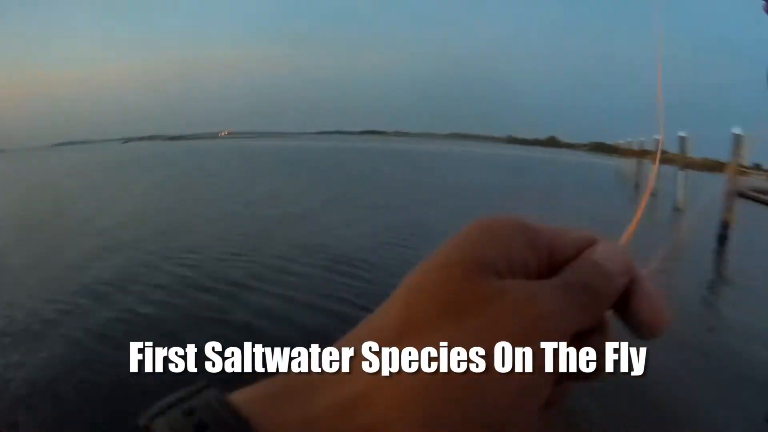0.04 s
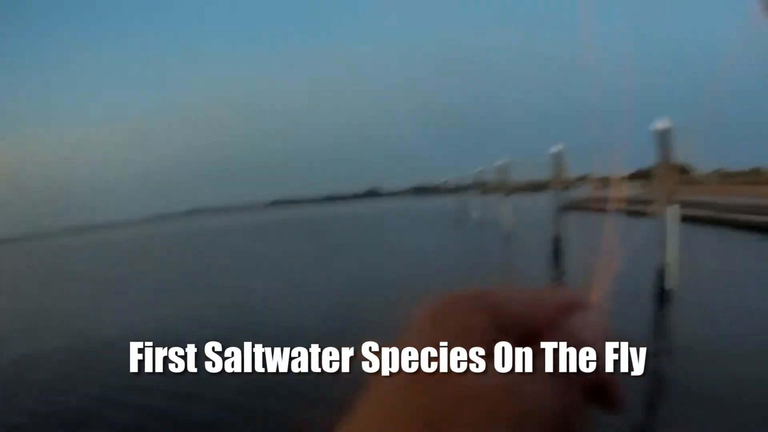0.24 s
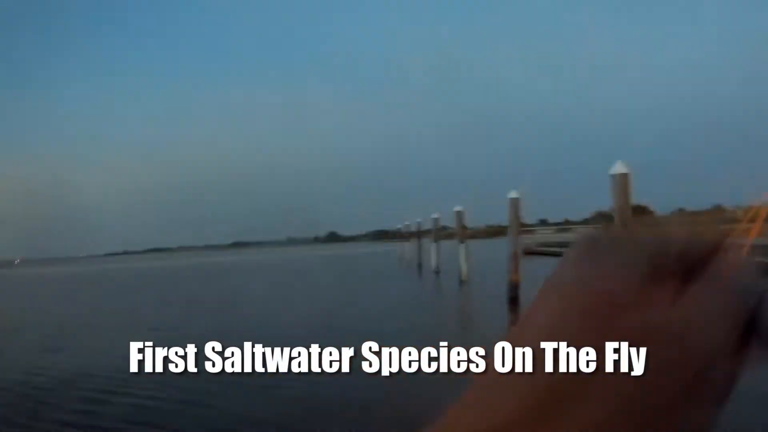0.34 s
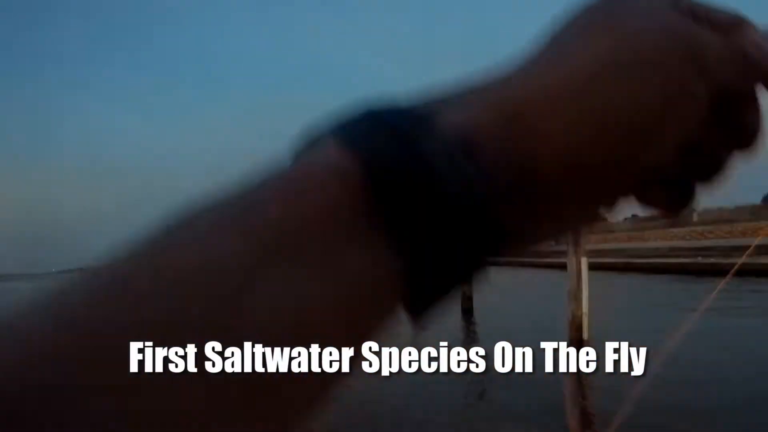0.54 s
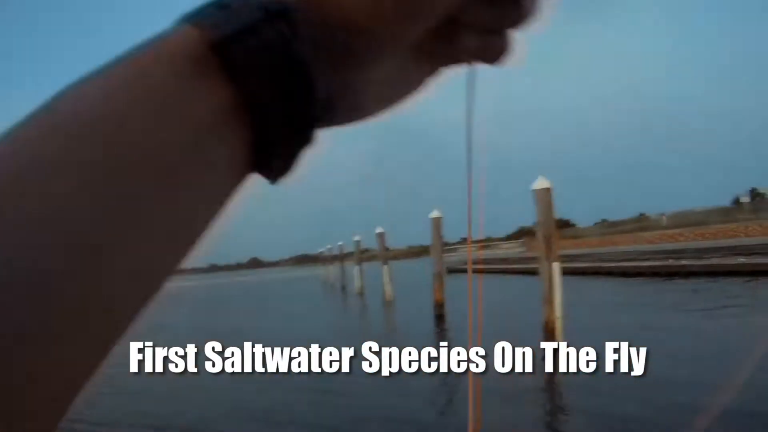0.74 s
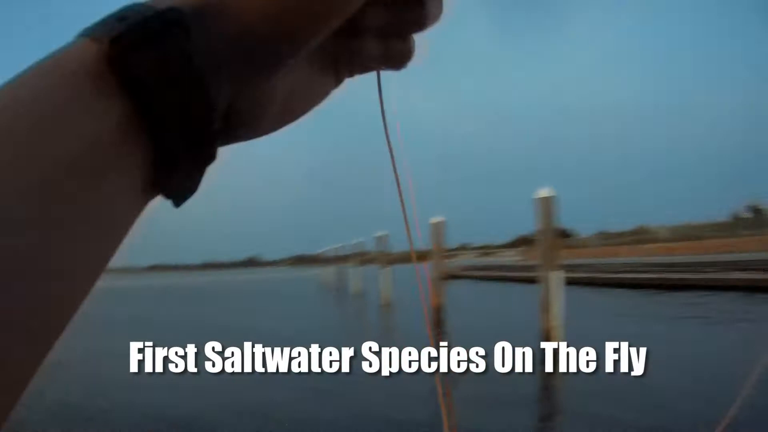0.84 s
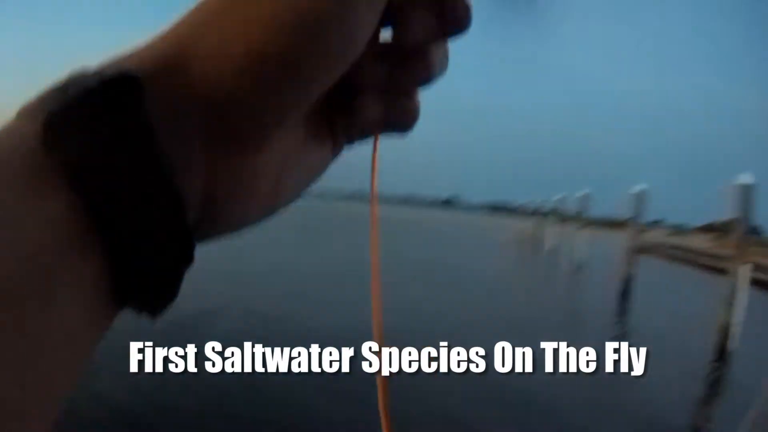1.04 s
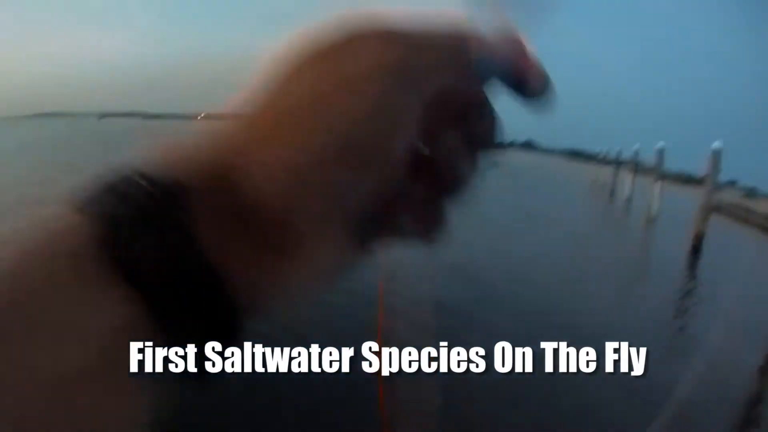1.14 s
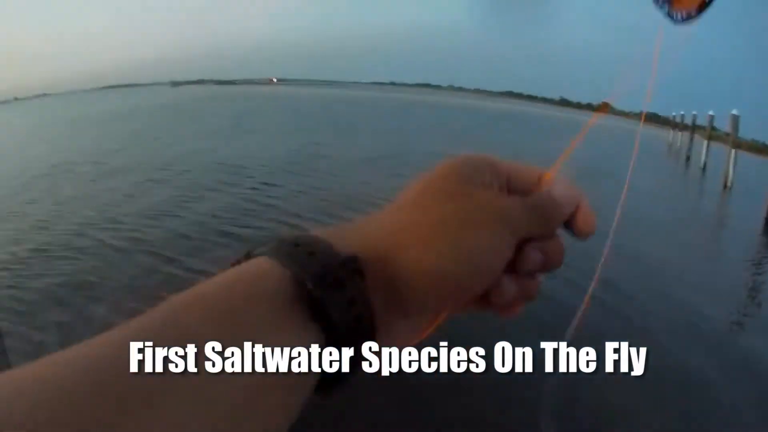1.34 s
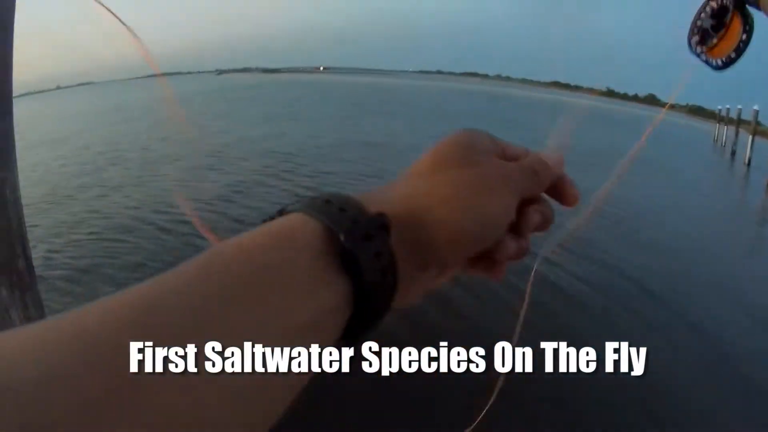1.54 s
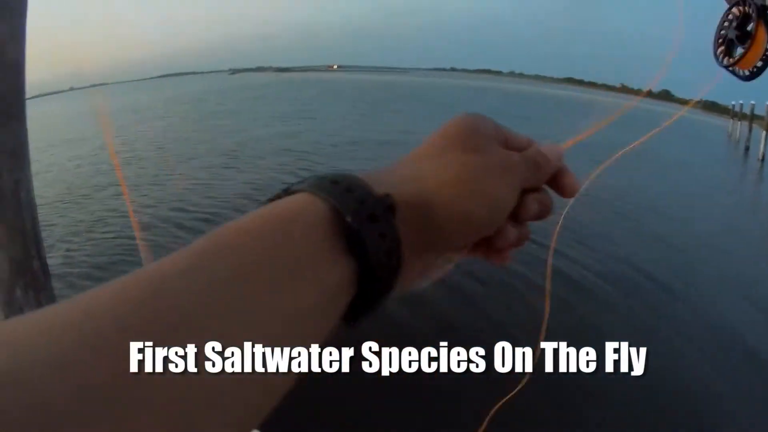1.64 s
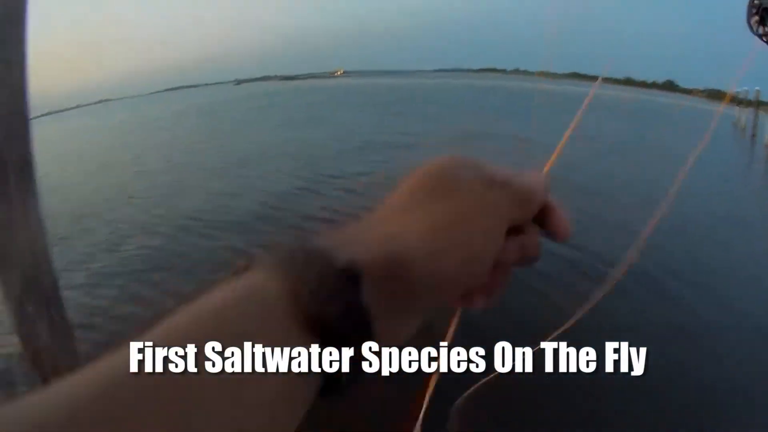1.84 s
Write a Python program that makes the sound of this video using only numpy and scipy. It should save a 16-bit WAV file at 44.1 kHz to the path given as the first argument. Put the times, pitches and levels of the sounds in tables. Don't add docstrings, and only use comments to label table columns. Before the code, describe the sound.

Sharp plastic snaps from fishing line handling: light ticks at 0.18-0.25 s, the loudest bright crack at 0.30 s with a quick rattle, dull thumps at 0.36 and 0.49 s. Cloth rubs from 0.3 to 0.53 s, tiny tinkles until 0.71. A soft double tick at 0.97, low thump at 1.04, faint rubbing and scuffs around 1.1-1.5, last tick at 1.70. Gated hiss, thin high whine and deep rumble underneath; close, dry, outdoors.

```python
import sys
import numpy as np
from scipy import signal
from scipy.fft import rfft, irfft
from scipy.io import wavfile
from scipy.ndimage import uniform_filter1d

SR = 44100
rng = np.random.default_rng(int(sys.argv[2]) if len(sys.argv) > 2 else 0)


def store_pcm(level_fs):
    pcm = np.round(np.clip(level_fs, -1, 1) * 32767).astype(np.int16)
    wavfile.write(sys.argv[1], SR, np.atleast_2d(pcm).T)


def boost_factor(decibels):
    exponent = np.asarray(decibels, float) / 20
    return 10 ** exponent


N = 83790
TIME = np.arange(N) / SR


def curve(rows):
    return np.interp(TIME, *np.array(rows).T)


def unit(x):
    return x / np.sqrt(np.mean(x ** 2))


def ring(x, hz, t60):
    pole = np.exp(2j * np.pi * hz / SR - np.log(1000) / (t60 * SR))
    return signal.lfilter([1], [1, -pole], x).imag


def band(x, hz, width):
    return signal.lfilter(*signal.iirpeak(hz, hz / width, fs=SR), x)


def walk(rate):
    hold = int(SR / rate)
    steps = np.repeat(rng.standard_normal(N // hold + 1), hold)
    return unit(uniform_filter1d(uniform_filter1d(steps, hold), hold)[:N])


def bump(start, length):
    return np.exp(-(2 * (TIME - start) / length) ** 2)


def whine():
    whine_hz, side_hz = 13714, 10204
    # centre in seconds, level in dB, length in seconds.
    side_swells = [
        (.575, -71, .07),
        (0.742, -73, .06),
        (.97, -80, .06),
        (1.197, -68.5, .06),
        (1.46, -69, .07),
    ]
    phase = 2 * np.pi * whine_hz * TIME
    main = boost_factor(-64.5 + 1.8 * walk(70)) * np.sin(phase)
    half = boost_factor(-77.5) * np.sin(phase / 2)
    side_level = sum(boost_factor(db) * bump(start, length) for start, db, length in side_swells)
    return main + half + side_level * np.sin(phase * side_hz / whine_hz)


def hiss():
    # time in seconds, gain in dB.
    gate = [(0, -4.5), (.168, -6), (.3, 1), (.364, 3), (.454, -4.5), (.508, 4), (.618, -1.5), (1.035, -5.5),
            (1.1, 3.5), (1.152, -6.5), (1.196, 0), (1.598, -3.5), (1.9, -6.5)]
    # frequency in Hz, density in dB per Hz.
    colour = [(60, -2.5), (133, 0.5), (200, -7.5), (850, -14.5), (5600, -19.5), (12000, -18.5),
              (14500, -21.5), (16000, -15)]
    bin_hz = np.maximum(np.arange(N // 2 + 1) * SR / N, 1)
    colour_hz, colour_db = np.array(colour).T
    shape = boost_factor(np.interp(np.log(bin_hz), np.log(colour_hz), colour_db)) * (bin_hz > 40)
    noise = unit(irfft(rfft(rng.standard_normal(N)) * shape, N))
    noise = noise * boost_factor(-58.5 + .5 * walk(8))
    opening = boost_factor(uniform_filter1d(curve(gate), size=SR // 20))
    return opening * (noise + np.sqrt(2) * whine())


def rumble(hz):
    noise = band(rng.standard_normal(N), hz, hz)
    return unit(band(band(noise, hz, 0.87 * hz), hz, 2 * hz))


def sway():
    # time in seconds, level in dB.
    sway_level = [(0.0, -44.5), (0.094, -64), (0.322, -35.5), (0.418, -51), (0.444, -49), (0.73, -56),
                  (0.788, -47), (0.926, -57), (1.052, -49), (1.084, -76), (1.136, -42), (1.434, -51),
                  (1.476, -76), (1.54, -57.5), (1.872, -70), (1.9, -54)]
    swings = unit(rumble(17.8) + boost_factor(-10.5) * rumble(36.4))
    return swings * boost_factor(uniform_filter1d(curve(sway_level), size=SR // 40))


def rub():
    grains_per_s, grain_db, flicker_db = 6000, 1.7, 1.5
    # time in seconds, level in dB.
    effort = [(0, -81.5), (.16, -75), (.23, -69.5), (.29, -59), (.33, -55), (.45, -56.5), (.5, -53.5),
              (.54, -67.5), (.66, -66), (.72, -76), (.95, -78), (1.04, -69), (1.09, -65.5), (1.24, -63.5),
              (1.33, -68.5), (1.4, -71.5), (1.72, -77.5), (1.9, -74)]
    # pitch in Hz, width in Hz, level in dB.
    cloth = [
        (140.7, 19, -1),
        (306, 190, -9.5),
        (877, 1150, -5.5),
        (1591, 325, -2),
        (2694, 960, -7),
        (4430, 4100, -12.5),
        (8300, 5800, -4.5),
    ]
    out = 0
    for hz, width, db in cloth:
        chance = rng.random((3, N))
        present = chance[0] < grains_per_s / SR
        size = boost_factor(-grain_db * np.log(1 - chance[1]))
        grains = present * size * np.sign(chance[2] - .5)
        rustle = unit(band(band(grains, hz, 1.26 * width), hz, 1.26 * width))
        out = out + boost_factor(db + flicker_db * walk(35.6)) * rustle
    return out * boost_factor(curve(effort))


def tinkles():
    # centre in seconds, pitch in Hz, level in dB, length in seconds.
    touches = [(.545, 9400, -70, .01), (.575, 9500, -68, .01), (.610, 9600, -63, .012),
               (.618, 9000, -69, .008), (.642, 11800, -62, .01), (.652, 7200, -68, .008),
               (.667, 9400, -68, .006), (.700, 9500, -65, .01), (.709, 9000, -65, .01),
               (.625, 10200, -69, .01), (1.345, 7000, -69, .02), (1.365, 6000, -67, .008),
               (1.365, 8500, -68, .006), (1.463, 7000, -56, .004), (1.464, 6100, -57, .004),
               (1.502, 7000, -62, .008), (.17, 4000, -68, .006), (.393, 3800, -65, .005),
               (1.316, 1750, -61, .014), (.59, 9700, -70, .03), (.492, 1750, -45, .007),
               (.251, 3000, -58, .004), (.2525, 3900, -62, .005), (.468, 3800, -58, .004),
               (.381, 4300, -63, .004), (1.328, 1600, -64, .012), (1.488, 6200, -69, .006),
               (1.452, 6900, -69, .006), (1.466, 2500, -70, .005), (1.503, 6100, -69, .008),
               (1.335, 6000, -70, .015), (1.385, 8800, -70, .006), (.300, 3000, -60, .002),
               (.352, 1500, -49, .007), (.361, 1650, -57, .006), (.383, 1550, -56, .01),
               (.406, 1700, -58, .005), (.468, 1600, -58, .01), (.478, 1750, -59, .008),
               (.514, 1700, -59, .008), (.493, 1400, -50, .005), (.265, 1650, -64, .012),
               (.295, 1700, -60, .006), (.231, 1800, -57, .003), (.578, 1620, -62, .02),
               (1.075, 1150, -67, .015), (.332, 3900, -60, .005), (1.378, 1650, -66, .02),
               (.501, 2600, -62, .005)]
    out = np.zeros(N)
    for start, hz, db, length in touches:
        rough = unit(band(rng.standard_normal(N), hz, hz / 12))
        tone = np.sin(2 * np.pi * hz * TIME) + .7 * rough
        out += boost_factor(db) * tone * bump(start, length)
    return out


def mount():
    rise_cycles, contact_cycles, gain_db = .24, .26, 2
    # start in seconds, level in dB, pitch in Hz, 60 dB decay in seconds,
    # direction of the first swing (1 or -1).
    thumps = [(.2750, -40, 105, .03, 1), (.2797, -30, 105, .05, -1), (.3603, -24, 130, .045, -1),
              (.3703, -39, 145, .1, 1), (.3830, -36, 150, .06, -1), (.4878, -23, 200, .028, 1),
              (.4975, -43, 155, .13, -1), (1.0285, -44, 190, .07, -1), (1.0357, -27.5, 145.5, .12, 1),
              (.4875, -45, 700, .012, 1), (.4880, -37, 1100, .02, -1), (.4872, -48, 2700, .015, 1),
              (.3598, -45, 950, .015, -1), (1.304, -49, 135, .1, -1), (1.31, -53, 330, .08, 1),
              (1.58, -52, 130, .06, -1), (1.6, -52, 70, .1, 1), (.68, -52, 80, .1, 1),
              (.44, -44, 75, .15, -1), (.384, -46, 270, .04, -1), (.403, -47, 140, .06, 1),
              (.4905, -43, 450, .015, -1), (1.185, -52, 134, .12, 1), (.25, -46, 70, .1, -1),
              (1.038, -42, 70, .03, -1), (.535, -50, 90, .08, 1), (.61, -53, 130, .1, 1),
              (.465, -47, 100, .08, 1)]
    out = np.zeros(N)
    for start, db, hz, t60, way in thumps:
        since = np.maximum(TIME - start, 0)
        rise = 1 - np.exp(-since * hz / rise_cycles)
        swing = np.sin(2 * np.pi * hz * since) * boost_factor(-60 * since / t60) * rise
        contact = int(contact_cycles * SR / hz)
        push = uniform_filter1d(uniform_filter1d(swing, contact), contact)
        out += way * boost_factor(db + gain_db) * push
    return out


def case():
    grit_per_ms, main_low_hz, main_high_hz, top_hz = .3, 1400, 2000, 5500
    crack_db, crack_t60, crack_hz = -14, .007, 10000
    # start in seconds, level in dB, side modes in dB, top modes in dB,
    # contact length in milliseconds.
    ticks = [(.1768, -45, -12, -12, .2), (.2263, -35, -5, -9, .1), (.2355, -48, -14, -18, .4),
             (.2495, -58, 4, -10, 2), (.3027, -18, 0, 1, .1), (.3085, -25, 1, 1, .1),
             (.3117, -30, 0, -6, .1), (.3140, -34, 1, -10, .3), (.3172, -34, -16, -20, .5),
             (.3215, -40, -14, -20, .5), (.3490, -56, -16, -16, 4), (.3595, -46, -8, -14, 1),
             (.3800, -60, 2, 0, 3), (.4665, -57, 2, 0, 2), (.4875, -41, -16, -20, .4),
             (.4920, -41, -22, -22, .5), (.9663, -41, -20, -30, .4), (.9690, -42, -20, -30, .4),
             (1.2380, -57, -6, -10, 2), (1.3300, -56, -14, -14, 2), (1.6980, -55, -4, -10, .3)]
    # pitch in Hz, level in dB, 60 dB decay in seconds.
    modes = [(700, -25, 0.0023), (1250, -11.5, 0.0018), (1551, -4, 0.015), (1863, -17.5, 0.012),
             (2480, -7.5, 0.0054), (3053, -11.5, 0.013), (3840, 0, 0.0088), (5330, -12, 0.0092),
             (5940, -8.5, 0.0081), (6710, -5, 0.008), (7730, -12, 0.0077), (8840, -8, 0.0063),
             (11070, -6.5, 0.0049), (15100, -7, 0.0043)]
    blows = np.zeros((3, N))
    t = np.arange(600) / SR
    grit = rng.standard_normal((len(ticks), 600))
    for (start, db, side_db, top_db, ms), rough in zip(ticks, grit):
        i = int(start * SR)
        push = np.exp(-1000 * t / ms) * rough * grit_per_ms * min(ms, 1)
        push[0] = 1
        blows[:, i:i + 600] += push * boost_factor(db + np.array([[0], [side_db], [top_db]]))

    crack = band(grit[0], crack_hz, crack_hz) * boost_factor(crack_db - 60 * t / crack_t60)
    out = signal.fftconvolve(blows[2], crack)[:N]
    for k, (hz, db, t60) in enumerate(modes):
        is_main = main_low_hz < hz < main_high_hz
        group = int(not is_main) + int(hz > top_hz)
        sign = -1 if hz > main_high_hz and k % 2 else 1
        out = out + sign * boost_factor(db) * ring(blows[group], hz, t60)
    return out


def scene():
    top = signal.ellip(14, .3, 80, 15750, fs=SR, output="sos")
    steady = signal.sosfilt(top, rub() + hiss() + tinkles())
    ticks = signal.lfilter(*signal.butter(2, 540, "high", fs=SR), case())
    return (ticks + mount() + sway() + steady)[None]


def roll_off(x):
    return signal.sosfilt(signal.butter(12, 16870, fs=SR, output="sos"), x)


def record(dry):
    cut = signal.sosfilt(signal.ellip(10, .3, 80, 16500, fs=SR, output="sos"), dry)
    return roll_off(cut)


dry = scene()
out = record(dry)
store_pcm(out)
```